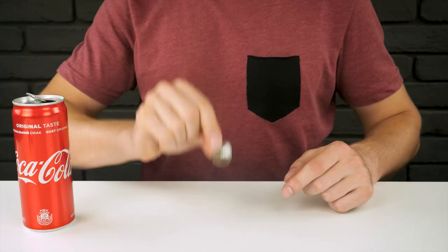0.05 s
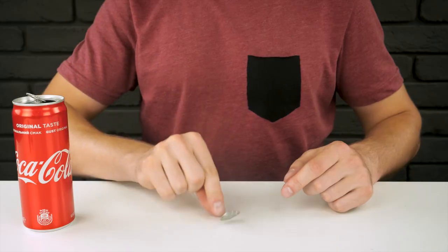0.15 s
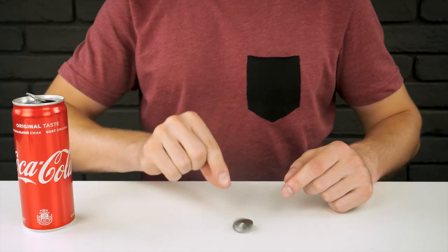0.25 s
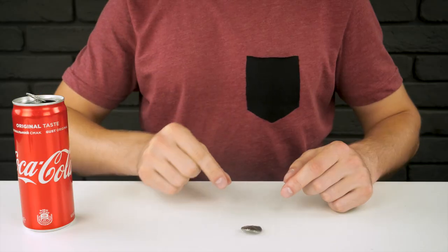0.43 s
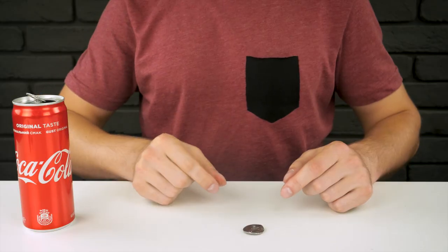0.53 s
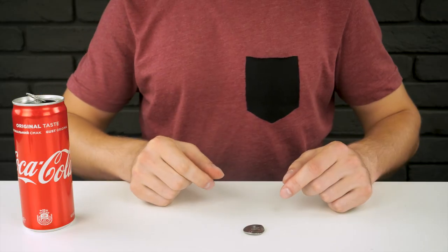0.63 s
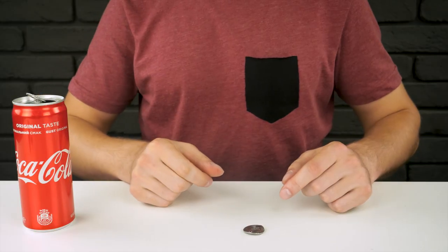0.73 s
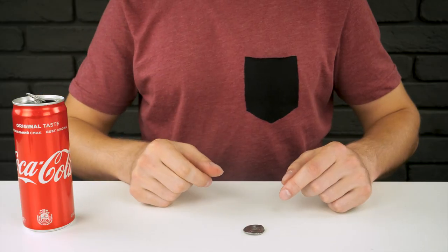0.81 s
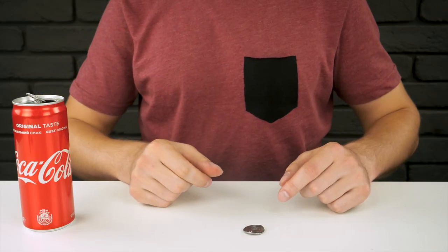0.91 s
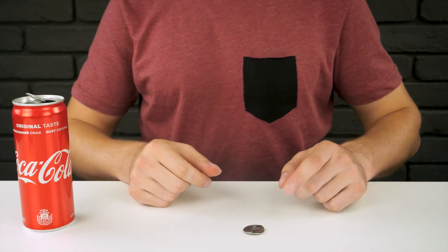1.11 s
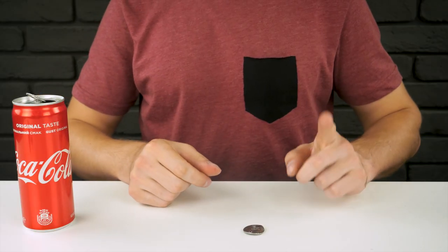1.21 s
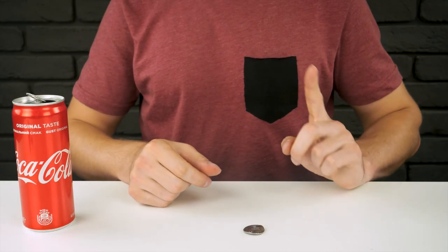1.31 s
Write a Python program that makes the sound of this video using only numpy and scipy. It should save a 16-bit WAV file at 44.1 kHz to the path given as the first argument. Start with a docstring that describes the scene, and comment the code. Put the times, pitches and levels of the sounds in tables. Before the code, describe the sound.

A coin hits a table with a sharp crack, then rattles briefly until lying flat.

```python
"""Low room noise sets in, then a coin lands on a hard tabletop with a sharp crack and a falling knock.
It bounces, clatters from rim to rim and rocks until it lies flat; one faint tick comes near the end.
Each impact is a short broadband pulse that excites the damped modes of the tabletop and two high
modes of the coin. Early reflections and the reverberation of a small room follow the clicks."""
import sys
import numpy as np
from scipy import signal
from scipy.fft import rfft, irfft, next_fast_len
from scipy.io import wavfile
from scipy.ndimage import uniform_filter1d

SR = 44100
rng = np.random.default_rng(int(sys.argv[2]) if len(sys.argv) > 2 else 0)


def persist_wave(psi):
    """Save psi, clipped to +-1, as 16-bit WAV."""
    counts = np.round(np.clip(psi, -1, 1) * 32767).astype(np.int16)
    wavfile.write(sys.argv[1], SR, np.atleast_2d(counts).T)


N = 59535


def amp(db):
    """Amplitude ratio of a level in decibels."""
    return 10 ** (np.asarray(db) / 20)


def along(points, hz):
    """Interpolation of (f/Hz, value) points on a logarithmic frequency axis."""
    f, values = np.transpose(points)
    return np.interp(np.log(hz + 1), np.log(f + 1), values)


def filtered(x, response):
    """Linear filtering: the spectrum is multiplied by a frequency response."""
    size = next_fast_len(N + SR // 2)
    return irfft(rfft(x, size) * response(np.fft.rfftfreq(size, 1 / SR)), size)[..., :N]


def convolved(x, response):
    """Convolution of a mono signal with one impulse response per channel."""
    return signal.fftconvolve(x[None], np.atleast_2d(response), axes=1)[:, :N]


def add(track, start_s, sound):
    """Superposition: a sound adds to the track from start_s on."""
    part = track[round(start_s * SR):][:len(sound)]
    part += sound[:len(part)]


def stereo(mid, side, width):
    """Sum and difference give left and right; the width curve scales the side at each frequency."""
    side = filtered(side, lambda hz: along(width, hz))[:len(mid)]
    return np.array([mid + side, mid - side])


# Spectral density of the room noise: f/Hz, relative level/dB
NOISE_SPECTRUM = [(15, -74), (25, -48), (105, -14.5), (157, -5), (451, -1.5), (607, -9.5), (754, -8),
                  (1190, -19), (1480, -16), (2690, -32), (14400, -38), (16000, -47.5)]
# Its slow drift: t/s, level/dB
NOISE_LEVEL = [(.1, -58.5), (.2, -55.5), (.85, -57.5), (1.15, -57), (1.35, -55)]
# Its stereo width: f/Hz, side/mid ratio
NOISE_WIDTH = [(120, .025), (400, .08), (1200, .3), (5000, .5)]


def room_noise(start_s=0.0957, rise_s=0.0018):
    """Filtered Gaussian noise, strongest at low frequencies, where the two channels are coherent."""
    t = np.arange(N) / SR
    mid, side = filtered(rng.standard_normal((2, N)), lambda hz: amp(along(NOISE_SPECTRUM, hz)))
    level_db = np.interp(t, *np.transpose(NOISE_LEVEL))
    onset = np.clip((t - start_s) / rise_s, 0, 1)
    return stereo(mid, side, NOISE_WIDTH) / mid.std() * amp(level_db) * onset


# Stereo width of the reflections: f/Hz, side/mid ratio
ECHO_WIDTH = [(100, .02), (250, .06), (500, .2), (1000, 0.43), (2500, .46), (5000, 0.36), (9000, .26),
              (12500, 0.72)]


def diffuse_tail(t60_curve, delay_s):
    """Impulse response of a diffuse field: noise that decays exponentially in each band."""
    hz, t, bands = signal.stft(rng.standard_normal((2, SR // 2)), SR, nperseg=128)
    decay = amp(-60 * t / along(t60_curve, hz)[:, None])
    tail = signal.istft(bands * decay, SR, nperseg=128)[1]
    tail /= np.linalg.norm(tail[0])
    mid, side = np.pad(tail, ((0, 0), (round(delay_s * SR), 0)))
    return stereo(mid, side, ECHO_WIDTH)


# Reverberation time of the room: f/Hz, T60/s
REVERB_TIME = [(150, 0.42), (1000, .3), (4000, .28), (8000, 0.28), (14000, 0.13)]
# Colour of the clicks' reverberation: f/Hz, relative level/dB
REVERB_COLOUR = [(120, 3), (500, 6), (1500, 1), (4000, -5.5), (8000, -2), (14000, -0.5)]


def reflections(spots, ring, early_t60_s=0.052, early_delay_s=0.0005, late_delay_s=0.004):
    """Early reflections and reverberation differ for each struck spot; the coin's ring reverberates too."""
    early = sum(convolved(x, diffuse_tail([(1000, early_t60_s)], early_delay_s)) for x in spots)
    late = sum(convolved(x, diffuse_tail(REVERB_TIME, late_delay_s)) for x in spots)
    late = filtered(late, lambda hz: amp(along(REVERB_COLOUR, hz)))
    shimmer = convolved(ring, diffuse_tail(REVERB_TIME, late_delay_s))
    return amp(-0.5) * early + amp(-1) * late + amp(-6.5) * shimmer


# Normal modes of the tabletop: f/Hz, relative level/dB, T60/s
TABLETOP_MODES = [(282, 0, .28), (508, 1, .3), (752, 0, .3), (820, -1, .28), (856, -2, .25),
                  (1102, -2, .22), (1270, 0, .2), (1555, -4, .16), (1652, -2, .14), (1770, -2, .14),
                  (1976, -4, .17), (2105, -2, .17), (2425, 0, .11), (2525, -1, .12), (2780, 1, .15),
                  (3655, -3, .12), (3772, -1, .15), (3982, 0, .13), (4102, -2, .12), (4378, -2, .15),
                  (4700, -2, .11), (4890, -2, .13), (5035, -2, .1)]


def tabletop(clicks):
    """Modal superposition: every click excites the same set of damped sinusoids."""
    t = np.arange(SR // 2) / SR
    modes = sum(amp(db - 60 * t / t60) * np.cos(2 * np.pi * hz * t) for hz, db, t60 in TABLETOP_MODES)
    return amp(-43) * convolved(clicks, modes)[0]


def knock(start_hz=2387, end_hz=720, spread_hz=220, rise_s=0.023, fall_s=0.02):
    """Narrow-band noise: the landing sets off a diffuse knock in the table that swells, sinks and fades."""
    track, t = np.zeros(N), np.arange(SR // 4) / SR
    centre_hz = end_hz + (start_hz - end_hz) * np.exp(-t / fall_s)
    phase = 2 * np.pi * np.cumsum(centre_hz) / SR
    slow_noise = filtered(rng.standard_normal((2, N)), lambda hz: np.exp(-(hz / spread_hz) ** 2))
    in_phase, quadrature = slow_noise[:, :len(t)]
    band = in_phase * np.sin(phase) + quadrature * np.cos(phase)
    band /= np.hypot(in_phase.std(), quadrature.std())
    swell = (t / rise_s * np.exp(1 - t / rise_s)) ** 2
    add(track, CONTACTS[0][0], amp(-32) * swell * band)
    return track


def pulse(spectrum_db, dispersion_hz=1300, size=2048):
    """A minimum-phase pulse with dispersion: the table's bending waves lag below dispersion_hz."""
    hz = np.fft.rfftfreq(size, 1 / SR)
    cepstrum = irfft(np.log(amp(spectrum_db(hz))))
    cepstrum[1:size // 2] *= 2  # folding the cepstrum makes the pulse causal
    cepstrum[size // 2 + 1:] = 0
    all_pass = (1j * hz - dispersion_hz) / (1j * hz + dispersion_hz)
    return irfft(np.exp(rfft(cepstrum)) * all_pass)


# Spectrum of one click: f/Hz, relative level/dB
CLICK_SPECTRUM = [(40, -63), (70, -47.5), (110, -27), (300, -21.5), (650, -19), (1050, -14), (1400, -5),
                  (2400, 0), (3200, 0), (4000, 0), (5300, -1), (6300, -4), (7800, -5.5), (9500, -14),
                  (12000, -22.5), (14500, -29.5), (16500, -58)]
# Weights with which a contact's treble raises the highs and lowers the bass: f/Hz, weight
TREBLE_WEIGHT = [(4000, 0), (6500, 1), (12000, 1.24)]
BASS_WEIGHT = [(1000, 0.85), (2500, 0.07)]


def click(treble_db):
    """Spectral tilt of an impact: a duller, flatter blow has less treble and pushes the table harder."""
    tilt = lambda hz: along(TREBLE_WEIGHT, hz) - 0.62 * along(BASS_WEIGHT, hz)
    return amp(-4) * pulse(lambda hz: along(CLICK_SPECTRUM, hz) + treble_db * tilt(hz))


# Spectrum of the rim's crack at the first landing: f/Hz, relative level/dB
CRACK_SPECTRUM = [(4000, -32.5), (6500, 2), (9000, 3.5), (12500, -4), (15000, -2), (17000, -6.5)]
# Contacts of coin and table, all levels relative:
# t/s, click level/dB, treble/dB, lower coin mode level/dB, upper coin mode level/dB
CONTACTS = [(.219, 16.5, -4, -54, -53), (.21942, 9.5, -5, -54, -52.5), (0.2361, 14.5, -10.5, -59, -50.5),
            (0.2933, 6.5, -12, -56, -52), (.2964, -2, -14, -55, -55), (.3204, 6, -7.5, -61.5, -55.5),
            (0.337, 4.5, -2, -60, -50), (0.3466, -1, -13, -52, -56), (.351, 9.5, -2, -43, -63.5),
            (.354, -4.5, -5.5, -43, -63), (0.3607, 4.5, 3, -43.5, -61.5), (0.3714, 0.5, 0.5, -57.5, -62),
            (.3729, 5, -2.5, -56, -56.5), (.3839, 1.5, -5, -58, -48), (0.3974, -7, -1.5, -58, -46),
            (.4069, -5, -19.5, -56, -54.5), (0.4454, -2.5, -9.5, -62, -58.5), (.4495, 8, 1.5, -51, -62),
            (0.457, 6, 0.5, -53.5, -56.5), (.4671, 9.5, 4.5, -45, -37.5), (.4941, 6, -7.5, -54, -43),
            (.519, 9, 0.5, -58.5, -55), (0.5343, 8, 0.5, -53, -56), (0.5422, 9.5, 1.5, -53.5, -57),
            (0.5699, -12, -6, -49, -51), (0.5856, -7, -12, -50, -63), (0.5908, 10, 2, -52, -62),
            (.6007, 2.5, -0.5, -50, -50), (.607, -1.5, 6.5, -54, -41), (0.635, -12, -6, -50, -43),
            (.6408, 8, -2, -50, -53), (.6426, 6.5, 1.5, -57, -58), (.6509, -12.5, 16.5, -49, -50),
            (0.675, 6, 0.5, -59, -57), (0.676, 2, -13.5, -59, -55), (0.696, -14, -1, -55, -54),
            (0.6999, 3.5, 2, -65, -60), (0.7014, -1, 0, -63, -54), (.7182, 1, -1, -57, -57),
            (0.7327, 0.5, -1.5, -68, -56), (0.7443, -4.5, 0, -63, -51), (0.7517, -9, -8, -59, -57),
            (.758, -11.5, 0, -58, -53), (0.7637, -29, -12, -60, -53), (.772, -38, -3, -63, -63)]


def impacts(tick_s=1.3129):
    """Impulsive excitation: the rim strikes two spots in turn, giving one train of clicks for each."""
    spots = np.zeros((2, N))
    for i, (start_s, level_db, treble_db, *_) in enumerate(CONTACTS):
        add(spots[i % 2], start_s, amp(level_db) * click(treble_db))
    crack = pulse(lambda hz: along(CRACK_SPECTRUM, hz))
    add(spots[0], CONTACTS[0][0], amp(-1.5) * crack)
    add(spots[0], tick_s, amp(-22) * click(treble_db=-3.5))  # the faint late tick
    return spots


# Normal modes of the coin: f/Hz, T60/s
COIN_MODES = [(11886, .45), (12934, .45)]


def coin_ring(detune_hz=6, flat_s=0.776, choke_t60_s=0.19):
    """Damped free vibration: each contact resets the modes' level and pitch; lying flat chokes them."""
    t, contacts = np.arange(N) / SR, np.array(CONTACTS)
    latest = np.maximum(np.searchsorted(contacts[:, 0], t) - 1, 0)
    age_s = t - contacts[latest, 0]
    ring = np.zeros(N)
    for (hz, t60), struck_db in zip(COIN_MODES, contacts[:, 3:].T):
        decay = (age_s > 0) * amp(struck_db[latest] - 60 * np.abs(age_s) / t60)
        envelope = uniform_filter1d(decay, size=48)
        pitch_hz = hz + detune_hz * rng.standard_normal(len(contacts))[latest]
        ring += envelope * np.sin(2 * np.pi * np.cumsum(pitch_hz) / SR)
    choke = amp(-60 * np.maximum(t - flat_s, 0) / choke_t60_s)
    return amp(3) * ring * choke


def scene():
    """Superposition of the direct sound of coin and table, its reflections and the room noise."""
    spots, ring = impacts(), coin_ring()
    clicks = spots.sum(axis=0)
    echoes = reflections(spots, ring)
    direct = clicks + ring + tabletop(clicks) + knock()
    return direct + echoes + room_noise()


def record(dry, ceiling=1.1, low_cut_hz=75, top_hz=16500):
    """Soft saturation rounds the loudest peak; band limiting removes the deep bass and extreme treble."""
    rounded = dry / (1 + np.abs(dry / ceiling) ** 6) ** (1 / 6)
    low_cut = signal.butter(2, low_cut_hz, "highpass", fs=SR, output="sos")
    return filtered(signal.sosfilt(low_cut, rounded), lambda hz: 1 / (1 + (hz / top_hz) ** 120))


dry = scene()
out = record(dry)
persist_wave(out)
```